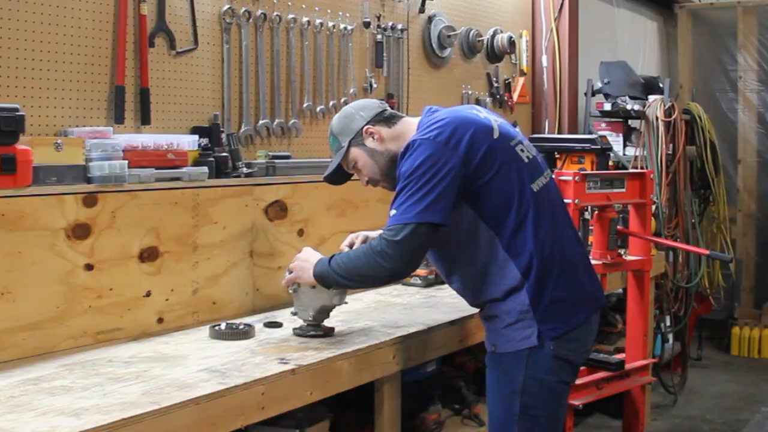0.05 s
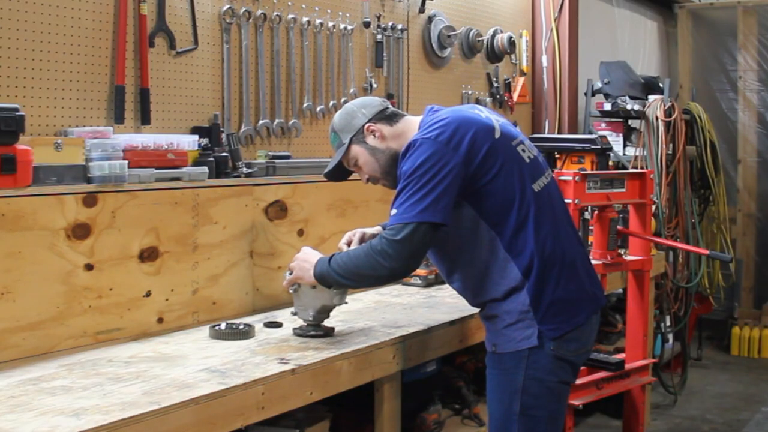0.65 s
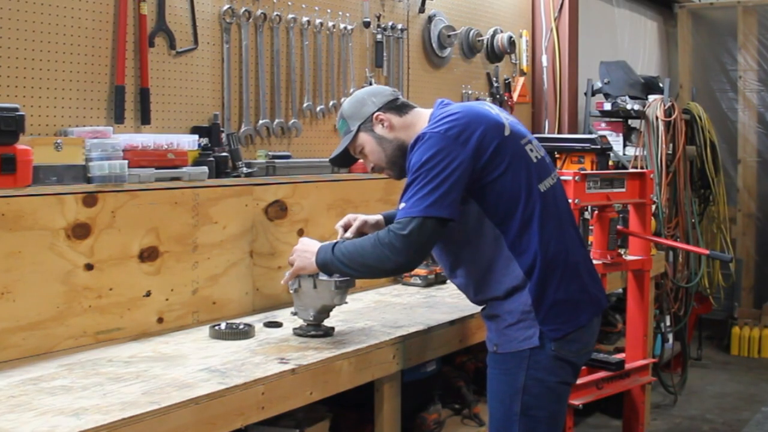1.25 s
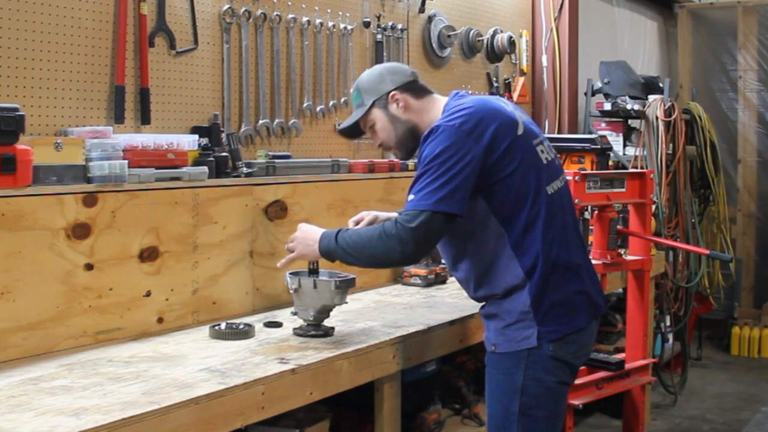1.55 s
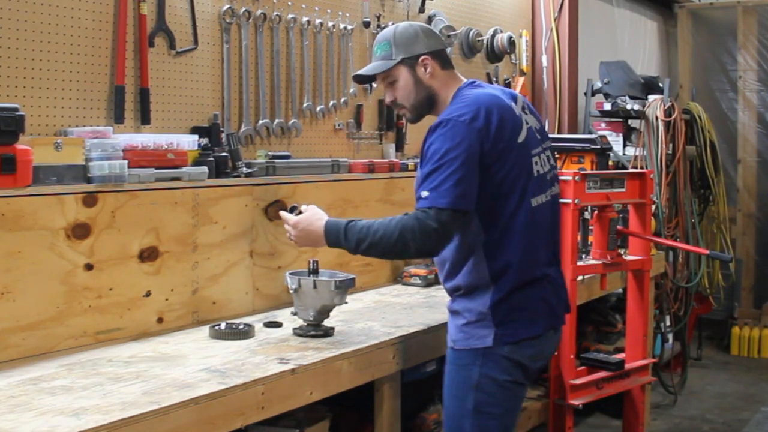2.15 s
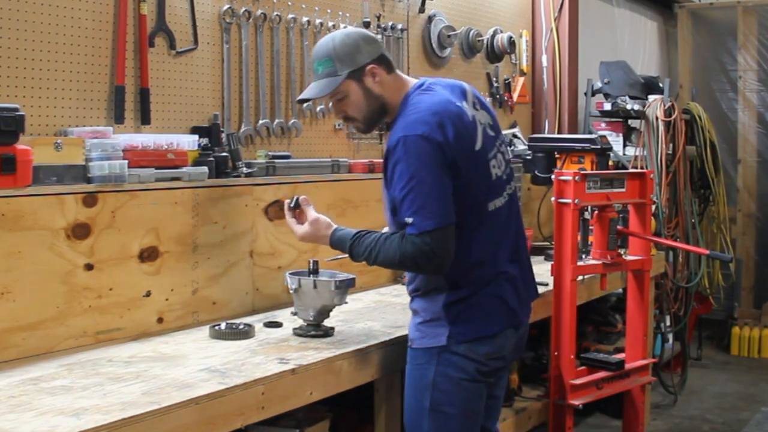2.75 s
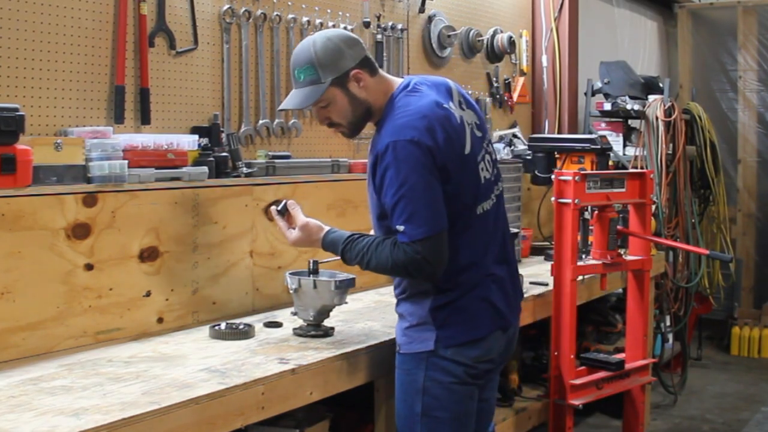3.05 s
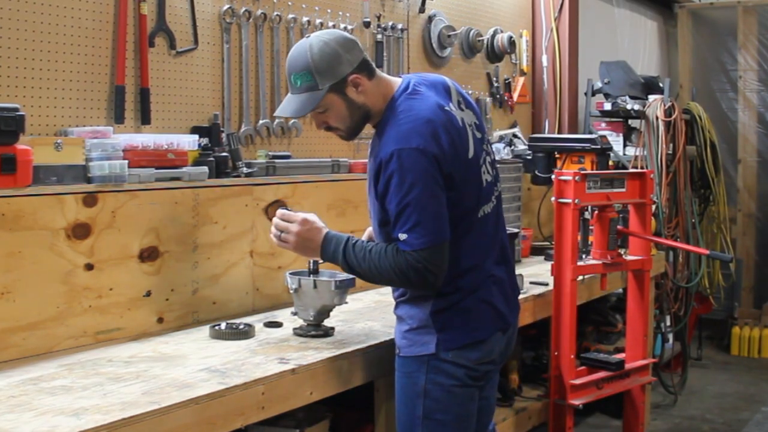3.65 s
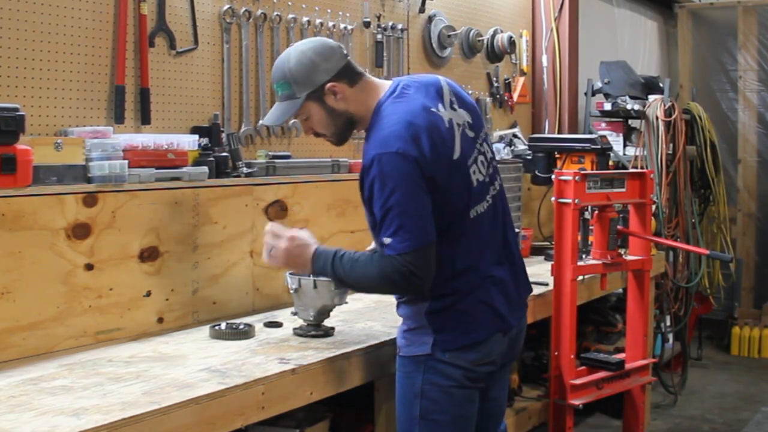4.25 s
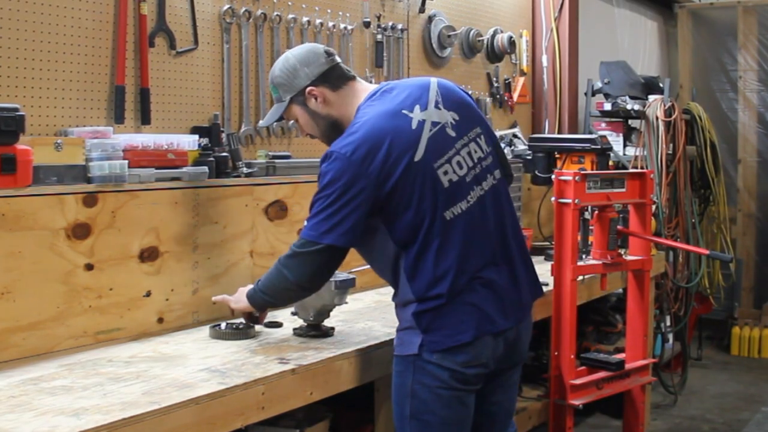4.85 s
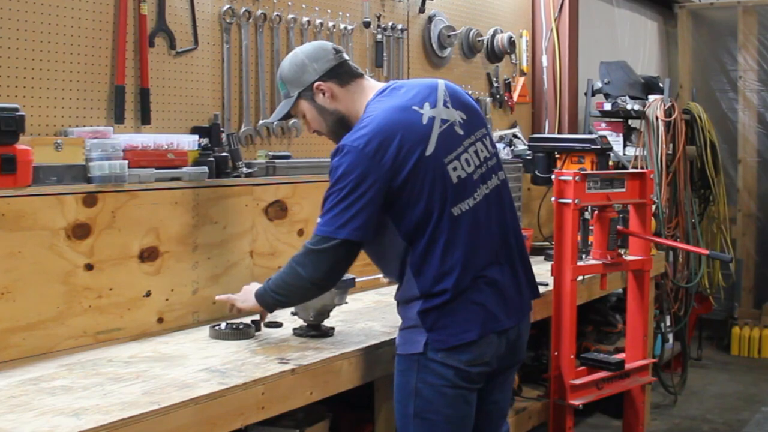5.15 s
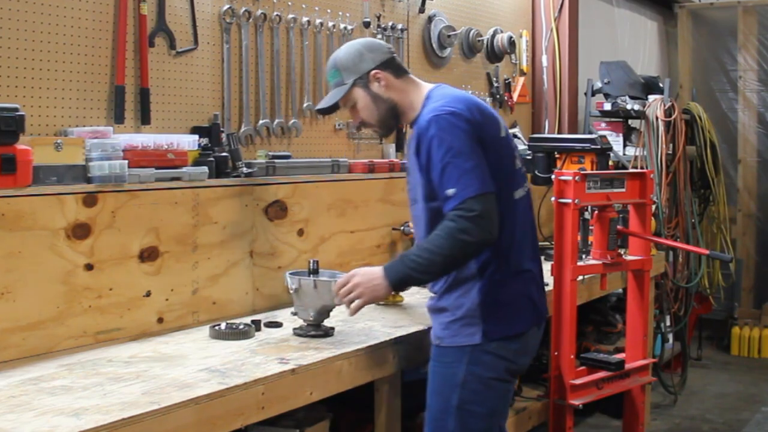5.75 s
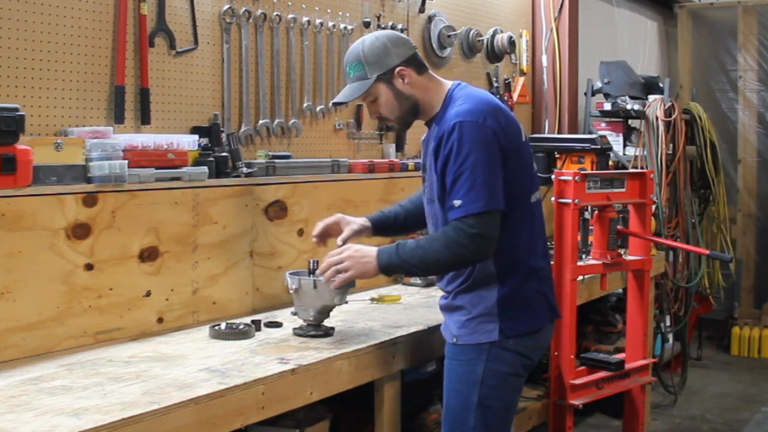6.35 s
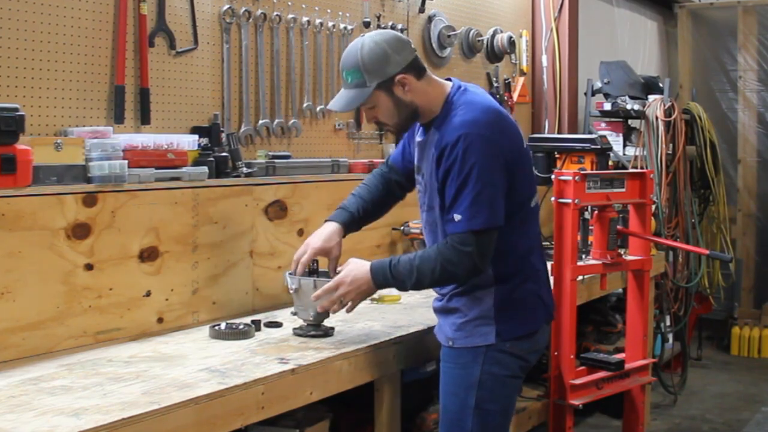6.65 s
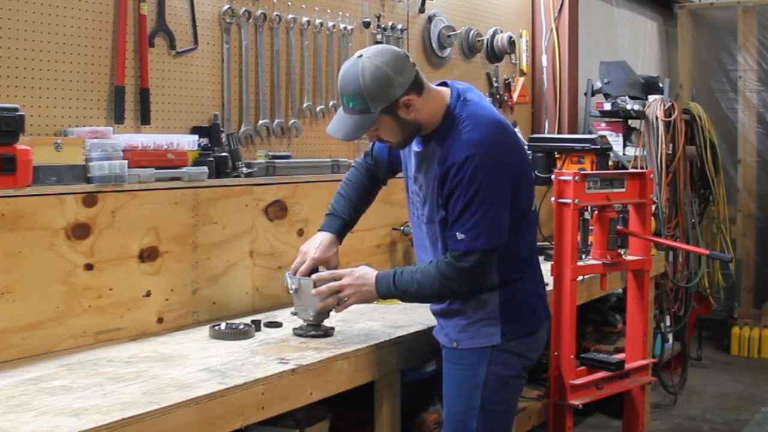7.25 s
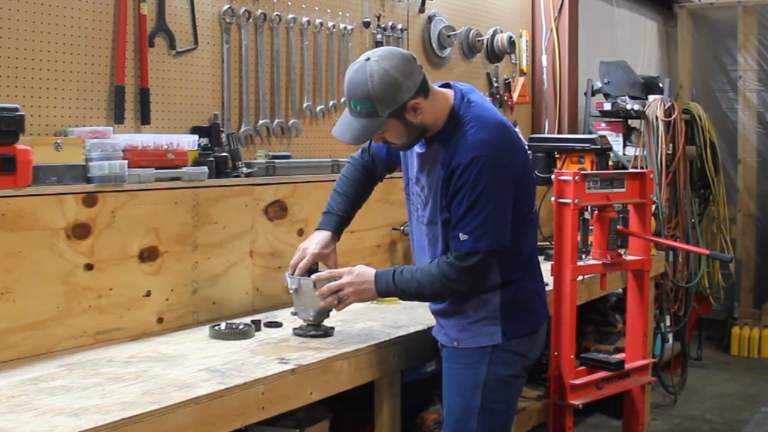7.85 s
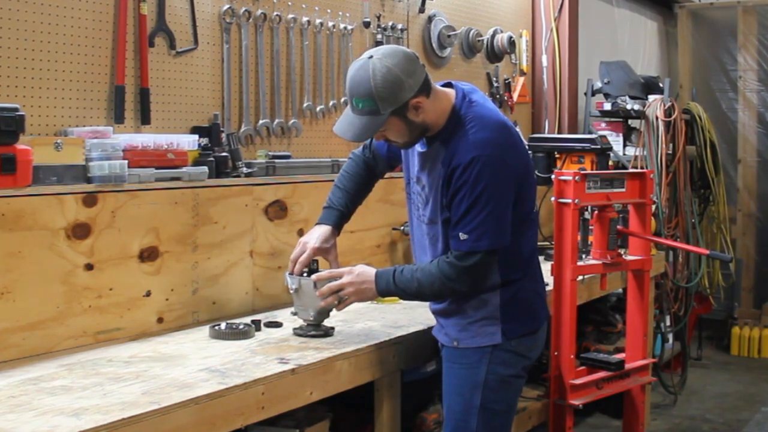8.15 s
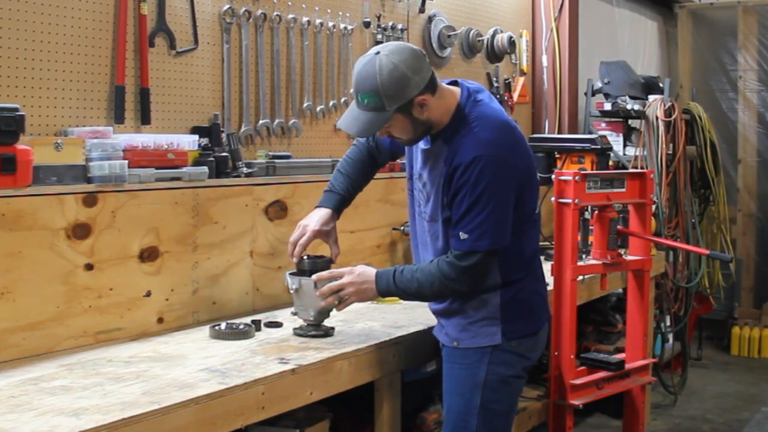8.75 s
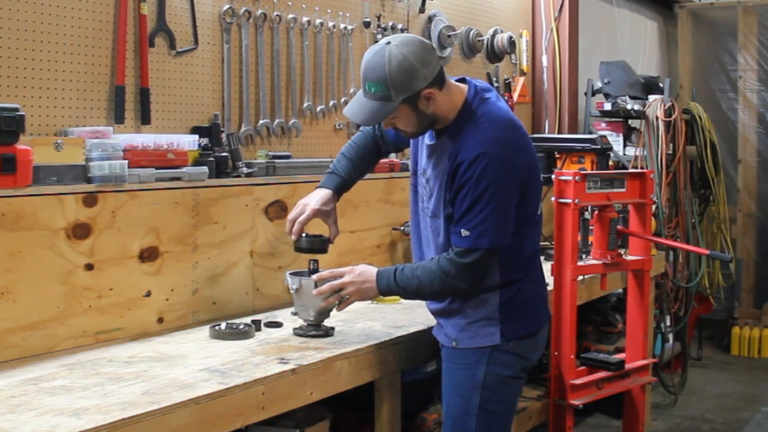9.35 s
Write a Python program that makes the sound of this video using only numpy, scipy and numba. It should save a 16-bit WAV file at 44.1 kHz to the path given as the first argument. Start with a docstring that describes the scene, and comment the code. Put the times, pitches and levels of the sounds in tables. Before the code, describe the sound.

Steel parts being pulled apart on a wooden bench, with a sharp clank, scattered knocks and scraping in a quiet workshop.

```python
"""Gearbox teardown on a wooden workbench

A man takes a small gearbox apart over shop hiss and a far fan. A steel part grates, snaps free and
later clatters onto the bench; the housing is knocked down; a drum is dragged off its shaft.
Blows ring steel and wood modes; stick-slip makes the rubs and the scuffs of soles and clothes.
The hard room rings after each blow; a limiter ducks the peaks and lets the tail swell back."""
import sys
import numpy as np
from scipy import signal
from scipy.fft import rfft, irfft
from scipy.io import wavfile
from scipy.ndimage import uniform_filter1d, minimum_filter1d
from numba import njit

SR = 44100
rng = np.random.default_rng(int(sys.argv[2]) if len(sys.argv) > 2 else 0)


def pcm_store(signal):
    """Save signal as 16-bit PCM."""
    levels = np.round(np.clip(np.atleast_2d(signal), -1, 1) * 32767)
    wavfile.write(sys.argv[1], SR, levels.astype(np.int16).T)


N = 422919

# Spectra. Each row: frequency in Hz, gain in dB.
AIR_EQ = [(15, -59), (25, -54), (44, -7), (80, -1), (141, -4.5), (180, -5.5), (317, -13.5), (354, -11),
          (416, -12), (775, -11.5), (1130, -16), (1330, -15), (2000, -17), (3720, -17.5), (16000, -26.5)]
HOUSING_EQ = [(60, -38), (450, -9.5), (750, -20.5), (1300, -16), (1750, -7), (3000, -9.5), (4400, -7),
              (5400, -8), (7000, -7.5), (8600, -5.5), (11000, -6), (13000, -13), (14600, -21),
              (16000, -5.5)]
PART_EQ = [(60, -40), (110, -18), (200, -7), (340, -16), (470, 1.5), (620, -0.5), (850, -3), (1200, 4),
           (1550, 1), (1900, 1), (2900, -4.5), (4300, -18), (7000, -27.5), (15000, -46)]
GRATE_EQ = [(59, -43), (100, -15), (337, -5.5), (570, -4.5), (660, 4), (764, -25), (831, -10.5),
            (1210, -1.5), (1490, -10.5), (2270, -9), (2750, -15), (3680, -11.5), (5960, -28), (15000, -31)]
WOOD_EQ = [(45, -22), (80, -11), (110, -2.5), (200, 2.5), (280, 2), (400, 0.5), (600, 1.5), (900, -3.5),
           (1200, -2.5), (1600, -5), (2500, -8.5), (5000, -30), (15000, -53)]
CLICK_EQ = [(60, -26), (500, 6), (1600, -6), (3200, 3.5), (4300, -2.5), (5300, 0), (6200, -4.5),
            (11000, -8), (15500, -14)]
SCUFF_EQ = [(50, -43), (200, -6), (600, -17), (1200, -6), (2300, 3), (4000, 0.5), (6000, -6), (10000, -8.5),
            (15500, -12.5)]
DRUM_EQ = [(120, -62), (200, -31), (324, 0), (369, -4), (457, 4.5), (598, -3.5), (710, -2.5), (917, -7.5),
           (1180, -13), (1450, -21), (1920, -16), (2590, -34), (6000, -39.5), (7800, -56), (13200, -120)]
RUMBLE_EQ = [(35, -28), (62, 0), (105, 10), (190, -10), (300, 0), (700, -59)]
RASP_EQ = [(500, -36), (900, 16), (1200, 6), (1500, -7), (2000, -2), (2700, -22), (9000, -35)]
# Body modes. Each row: frequency in Hz, gain over the excitation in dB, T60 in seconds.
HOUSING_RING = [(1004, 20.5, 0.1), (1640, -3.5, 0.012), (2390, 2.5, 0.017), (3060, 1, 0.033),
                (3600, -3, .015), (3700, 1.5, 0.016), (4570, -7, 0.012), (6720, 1, 0.0066),
                (7440, 3.5, 0.012), (11100, -9, 0.0068), (14000, 7.5, 0.0067)]
PART_RING = [(1165, -8, 0.031), (1215, -10, 0.074), (1350, -7, .04), (3810, 15, 0.044), (6100, 25.5, 0.13),
             (8086, 18, 0.19), (8700, 20, 0.21), (10930, 24, 0.27), (14460, 18, 0.18)]
BENCH_RING = [(64, 22, 0.79), (105, 24.5, 0.55), (176, 6.5, 0.051), (248, -7, 0.29), (336, 6.5, 0.12),
              (454, 4, 0.34), (578, 5.5, 0.18), (737, -8, 0.19), (800, -11, 0.44), (1154, 1.5, 0.092)]
DRUM_RING = [(462, -13, 0.093), (736, 6, .12), (820, -4, 0.033), (880, -4, .1), (5216, 26.5, 0.25),
             (7800, 41, .5)]
# Fan tones. Each row: centre in Hz, width in Hz, level in dB.
FAN_TONES = [(113.5, 19, -62), (544, 34, -68), (778, 16, -68), (1330, 126, -61.5), (1783, 61, -71.5)]
# Steel contacts. Each row: start in seconds, level in dB, hardness as a low-pass in Hz, ring in dB.
HOUSING_HITS = [(.2825, -50, 12000, 3), (.8392, -30.5, 14000, -10), (1.0105, -28, 8900, -17),
                (1.0222, -16, 4000, -14), (1.0548, 5, 19300, 7.5)]
PART_HITS = [(.2825, -41, 1830, 12), (4.9066, -16.5, 1860, 14), (4.9122, -11, 1490, 1),
             (4.9345, -9, 16000, -6), (4.9722, -13, 2590, -3)]
DRUM_HITS = [(8.261, -18, 16000, -1), (9.095, -40.5, 4050, 8.5), (9.103, -39.5, 3000, -2.5)]
# Pulls on the tight part. Each row: start in seconds, length in seconds, level in dB.
GRATE_PULLS = [(0.774, 0.064, -41.5), (0.826, 0.059, -24), (0.888, 0.031, -37.5), (1.017, 0.041, -33.5)]
# Bench knocks. Each row: start in seconds, wood level in dB, hardness in Hz, low cut in Hz,
# ring in dB, metal click level in dB, click hardness in Hz.
BENCH_HITS = [(.845, -24.5, 2600, 280, -19, -44, 3000), (1.011, -30.5, 398, 200, -8, -55, 3000),
              (1.054, -7, 104, 40, -13.5, -55, 3000), (2.4526, -17, 486, 290, -16, -37, 10000),
              (5.49, -42, 700, 150, -16, -59, 3000), (5.8162, -18.5, 232, 200, -3, -63, 2000),
              (5.8421, -6, 1080, 205, -12, -10, 4250), (6.075, -6, 1070, 200, -5.5, -12, 1830),
              (8.2599, -12.5, 1050, 39.6, -11, -23.5, 18000), (8.2700, -13, 2540, 35, -13, -26, 3980),
              (8.3685, -22.5, 2160, 70, -4.5, -37, 4500)]
# Body shifts. Each row: start in seconds, length in seconds, level in dB, brightness in dB.
SCUFF_MOVES = [(2.05, .28, -57.5, 5), (2.454, 0.011, -29.5, 3.5), (2.46, 0.041, -33.5, -0.5),
               (2.694, 0.21, -49.5, -4), (5.866, 0.2, -35.5, -5.5), (6.644, 0.029, -48, -15)]
# Pulls on the drum. Each row: start and length in seconds, then rub, rumble and rasp levels in dB.
DRUM_PULLS = [(7.748, 0.3, -56.5, -54.5, -72), (8.082, 0.11, -45, -41.5, -60),
              (8.18, 0.03, -34.5, -40, -45), (8.248, 0.19, -31, -33.5, -41), (8.448, 0.14, -34.5, -64, -54),
              (8.611, 0.052, -31.5, -52, -33.5), (8.676, 0.063, -36, -51, -65)]
# Workshop decay. Each row: frequency in Hz, T60 in seconds.
ROOM_DECAY = [(100, 0.94), (300, 0.52), (900, 0.48), (2200, 0.73), (4500, 0.89), (7500, 0.72), (11000, 0.5),
              (15000, 0.41)]


def amp(db):
    """Decibels to gain."""
    return 10 ** (np.asarray(db) / 20)


def unit(x):
    """Scale to rms 1."""
    return x / np.sqrt(np.mean(x ** 2) + 1e-20)


def read(points, hz):
    """Interpolate on a log-frequency axis."""
    points_hz, values = np.transpose(points)
    return np.interp(np.log(hz + 1), np.log(points_hz + 1), values)


def add(mix, start_s, sound):
    """Mix in place."""
    part = mix[round(start_s * SR):][:len(sound)]
    part += sound[:len(part)]


def cut(x, hz, kind="low", order=2):
    """Gentle low-pass or high-pass."""
    return signal.sosfilt(signal.butter(order, min(hz, .49 * SR), kind, fs=SR, output="sos"), x)


def colour(x, eq, size=4096):
    """Minimum-phase EQ: nothing sounds before a blow."""
    log_gain = np.log(amp(read(eq, abs(np.fft.fftfreq(size, 1 / SR)))))
    taps = np.fft.ifft(np.exp(np.conj(signal.hilbert(log_gain)))).real
    return signal.oaconvolve(x, taps[:size // 2])[:len(x)]


def whiten(x):
    """Flatten the spectrum, keep the timing."""
    z = rfft(x, 2 * len(x))
    return irfft(z / (abs(z) + 1e-12))[:len(x)]


def ring(x, modes, ring_db=0):
    """Excitation plus the damped modes it drives."""
    t = np.arange(SR // 2) / SR
    out = x.copy()
    for hz, db, t60_s in modes:
        decay = amp(-60 * t / t60_s)
        mode = 2 * decay / decay.sum() * np.cos(2 * np.pi * hz * t)
        out += amp(db + ring_db) * signal.oaconvolve(x, mode)[:len(x)]
    return out


def blow(eq, decay_s, scatter):
    """Contact pulse plus dense, dying vibration; energy of 10 ms at rms 1."""
    t = np.arange(SR // 2) / SR
    decay = amp(-60 * t / decay_s)
    shiver = rng.standard_normal(len(t)) * decay
    shiver *= scatter / np.linalg.norm(shiver)
    shiver[0] += 1  # the pulse
    sound = colour(whiten(shiver) * np.sqrt(decay), eq)
    return sound / np.linalg.norm(sound) * np.sqrt(SR / 100)


def steel_hits(rows, eq, modes, decay_s, scatter):
    """Blows on steel; softer contact, less treble."""
    out = np.zeros(N)
    for start_s, db, hard_hz, ring_db in rows:
        hit = ring(blow(eq, decay_s, scatter), modes, ring_db)
        add(out, start_s, amp(db) * cut(hit, hard_hz, order=3))
    return out


def slips(per_s, spread_db):
    """Stick-slip: random jerks of uneven size."""
    size = amp(spread_db * np.minimum(rng.exponential(1, N), 3))
    return size * rng.choice([-1, 1], N) * (rng.random(N) < per_s / SR)


def stroke(start_s, length_s, attack_s, release_s):
    """Gain of one rub: rise, hold, decay."""
    t = np.arange(N) / SR - start_s
    return np.clip(t / attack_s, 0, 1) * np.exp(-np.clip((t - length_s) / release_s, 0, 20))


def shop_air(hiss_db=-49.5):
    """Steady hiss plus a far fan's narrow noise bands."""
    hz = np.fft.rfftfreq(N, 1 / SR)
    white = rfft(rng.standard_normal(N))
    fan = sum(amp(db) * unit(irfft(white / (1 + (2 * (hz - centre_hz) / width_hz) ** 2), N))
              for centre_hz, width_hz, db in FAN_TONES)
    return amp(hiss_db) * unit(colour(rng.standard_normal(N), AIR_EQ)) + fan


def housing_snaps():
    """Steel snaps against the hand-damped housing."""
    return steel_hits(HOUSING_HITS, HOUSING_EQ, HOUSING_RING, decay_s=0.039, scatter=9.0)


def part_clatter():
    """The small part taps the housing, later bounces on the bench."""
    return steel_hits(PART_HITS, PART_EQ, PART_RING, decay_s=0.058, scatter=1.85)


def part_grating():
    """The tight part judders out of its seat."""
    level = sum(amp(db) * stroke(start_s, length_s, attack_s=0.013, release_s=0.0065)
                for start_s, length_s, db in GRATE_PULLS)
    return level * unit(colour(slips(per_s=900, spread_db=-1.5), GRATE_EQ))


def knock(db, hard_hz, low_hz, ring_db, click_db, click_hz):
    """One contact: the wooden top thuds and rings, the metal clicks."""
    wood = ring(blow(WOOD_EQ, decay_s=0.082, scatter=1.34), BENCH_RING, ring_db)
    thud = cut(cut(wood, hard_hz, order=3), low_hz, "high")
    click = cut(blow(CLICK_EQ, decay_s=0.14, scatter=1.9), click_hz, order=3)
    return amp(db) * thud + amp(click_db) * click


def bench_knocks(rebound_s=.0285):
    """A knocked part rocks back once, weaker and duller."""
    out = np.zeros(N)
    for start_s, db, *contact in BENCH_HITS:
        add(out, start_s, knock(db, *contact))
        rebound = cut(knock(db, *contact), hz=4530)
        rebound_db = -3.5 + 0.57 * db  # light knocks rebound less
        add(out, start_s + rebound_s, amp(rebound_db) * rebound)
    return out


def scuffing():
    """Soles and clothes slide on grit and fibres; shorter scuffs have sharper edges."""
    grit = unit(colour(slips(per_s=7200, spread_db=6.5), SCUFF_EQ))
    dull = cut(grit, 5500, order=1)
    out = np.zeros(N)
    for start_s, length_s, db, bright_db in SCUFF_MOVES:
        level = amp(db) * stroke(start_s, length_s, attack_s=.4 * length_s, release_s=.31 * length_s)
        out += level * (dull + amp(bright_db) * (grit - dull))
    return out


def drum_drag():
    """The drum rubs up its shaft, rings hollowly and shakes the bench while it grips."""
    jerks = slips(per_s=1100, spread_db=1.0)
    rub = unit(ring(colour(jerks, DRUM_EQ), DRUM_RING))
    rumble = unit(colour(jerks, RUMBLE_EQ))
    rasp = unit(colour(jerks, RASP_EQ))
    out = np.zeros(N)
    for start_s, length_s, rub_db, rumble_db, rasp_db in DRUM_PULLS:
        pull = stroke(start_s, length_s, attack_s=.04, release_s=0.015)
        out += pull * (amp(rub_db) * rub + amp(rumble_db) * rumble + amp(rasp_db) * rasp)
    return out


def drum_grazes():
    """The drum strikes the shaft breaking loose, grazes it lifting clear."""
    return steel_hits(DRUM_HITS, DRUM_EQ, DRUM_RING, decay_s=0.028, scatter=1.9)


def early_echoes(x, t60_s=0.171, delay_s=0.0015, per_s=1200):
    """Reflections off bench top, back board and tools."""
    t = np.arange(SR // 4) / SR
    echoes = rng.choice([-1, 1], len(t)) * (rng.random(len(t)) < per_s / SR)
    taps = whiten(echoes * amp(-60 * t / t60_s))
    taps = cut(taps * (t > delay_s), 3500, order=1)
    return signal.oaconvolve(x, taps)[:N]


def room_tail(x, build_s=0.0039):
    """Diffuse workshop reverb; each band decays at its own rate."""
    hz, t, noise = signal.stft(rng.standard_normal(SR), SR, nperseg=256)
    tail = signal.istft(noise * amp(-60 * t / read(ROOM_DECAY, hz)[:, None]), SR)[1]
    tail *= 1 - np.exp(-np.arange(len(tail)) / SR / build_s)
    return signal.oaconvolve(x, tail / np.linalg.norm(tail))[:N]


def scene():
    """Mono mix: direct sound, echo and tail sends, shop air."""
    snaps = housing_snaps()
    clatter = part_clatter()
    knocks = bench_knocks() + drum_grazes()
    rubs = part_grating() + drum_drag() + scuffing()
    direct = snaps + clatter + knocks + amp(-0.5) * rubs
    early = early_echoes(amp(-1.5) * snaps + amp(-3) * clatter + amp(-2) * knocks + amp(-4.5) * rubs)
    late = room_tail(amp(-6.5) * snaps + amp(-9.5) * (clatter + knocks) + amp(-8) * rubs)
    return (direct + early + late + shop_air())[None]


@njit
def follow(over_db, attack, release):
    """Gain reduction in dB: rises fast, lingers, relaxes."""
    out, peak, held = np.zeros(len(over_db)), 0., 0.
    for i in range(len(over_db)):
        peak += (over_db[i] - peak) * (attack if over_db[i] > peak else release)
        held = max(peak, held + (peak - held) * release)
        out[i] = held
    return out


def record(dry, threshold_db=-2, attack_s=0.0013, release_s=0.099, edge_hz=15950):
    """Limiter ducks peaks and what follows; then clip and band limit."""
    over_db = np.maximum(20 * np.log10(abs(dry[0]) + 1e-9) - threshold_db, 0)
    peaks_db = -minimum_filter1d(-over_db, size=96)
    duck_db = uniform_filter1d(follow(peaks_db, 1 / (attack_s * SR), 1 / (release_s * SR)), size=32)
    limited = np.clip(dry * amp(-duck_db), -1, 1)
    low_pass = signal.firwin(511, edge_hz, window=("kaiser", 8), fs=SR)
    return signal.oaconvolve(limited, low_pass[None], "same")


dry = scene()
out = record(dry)
pcm_store(out)
```